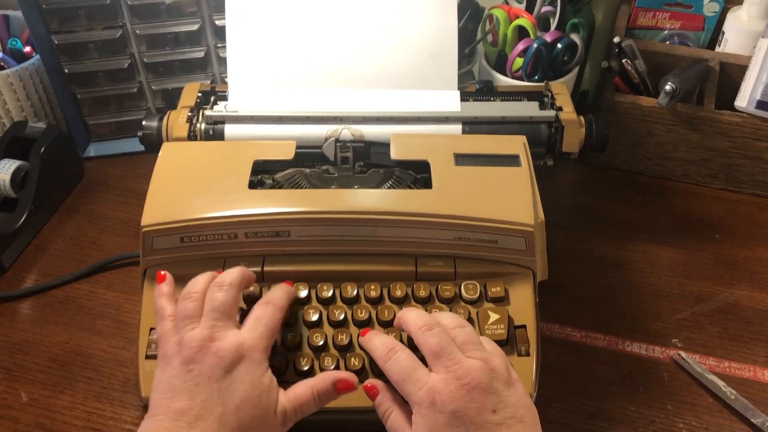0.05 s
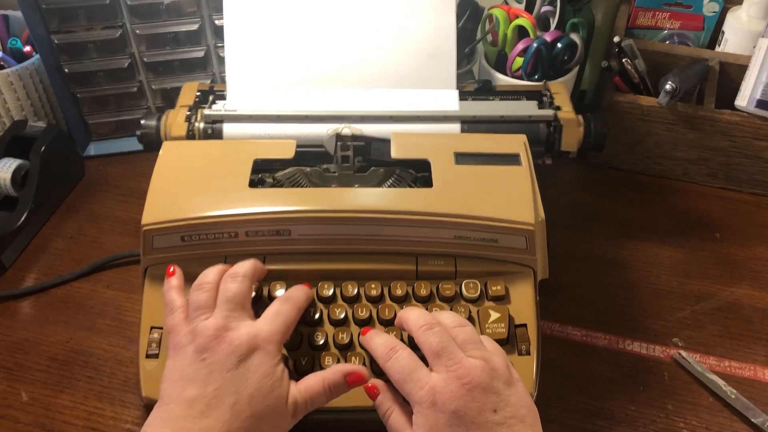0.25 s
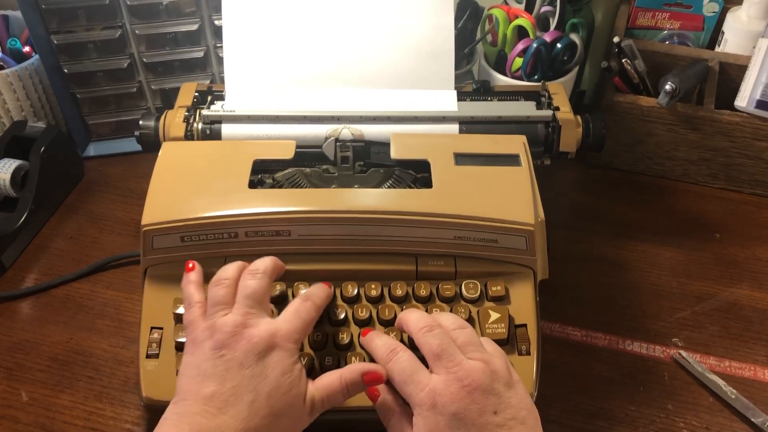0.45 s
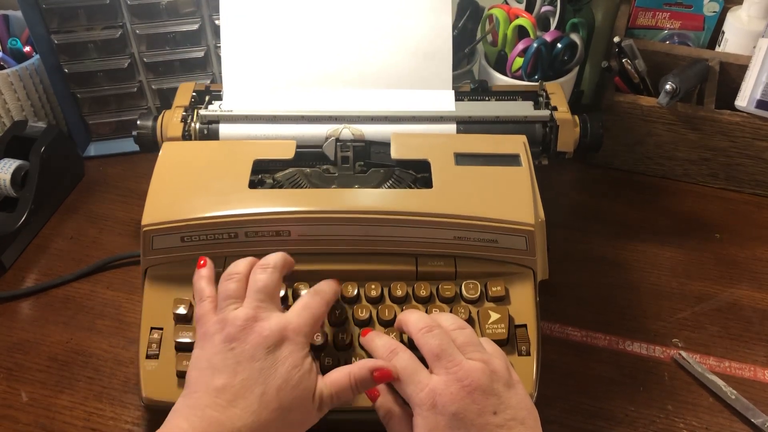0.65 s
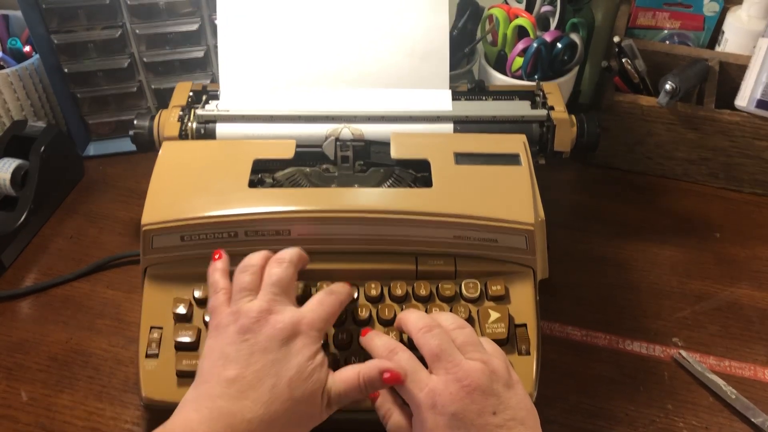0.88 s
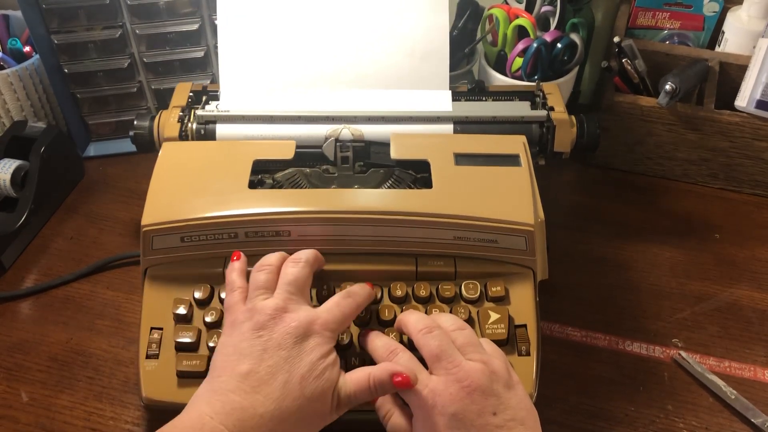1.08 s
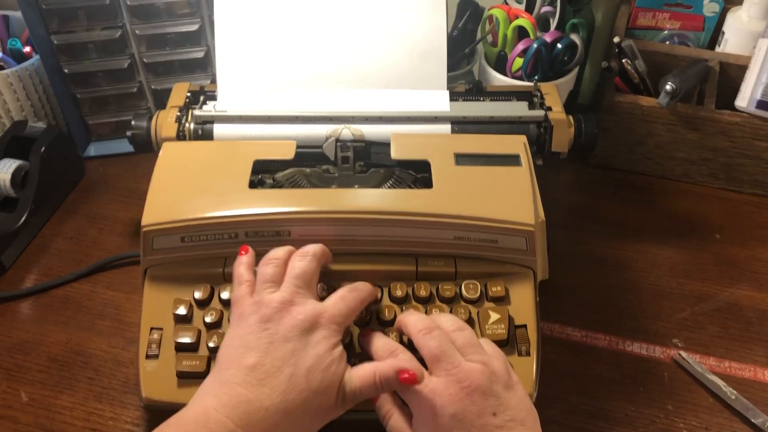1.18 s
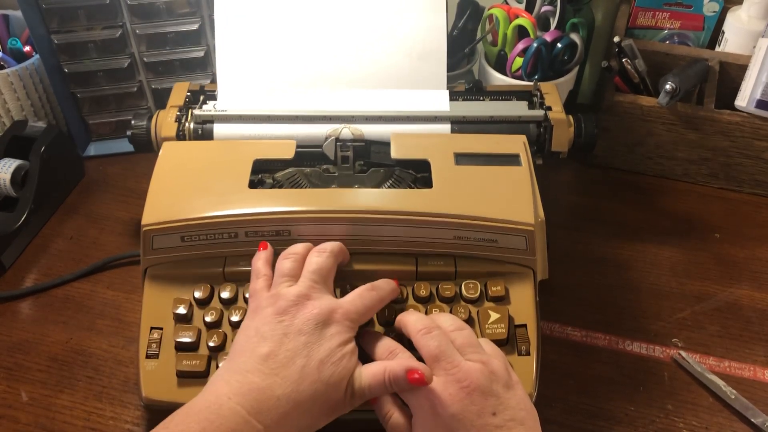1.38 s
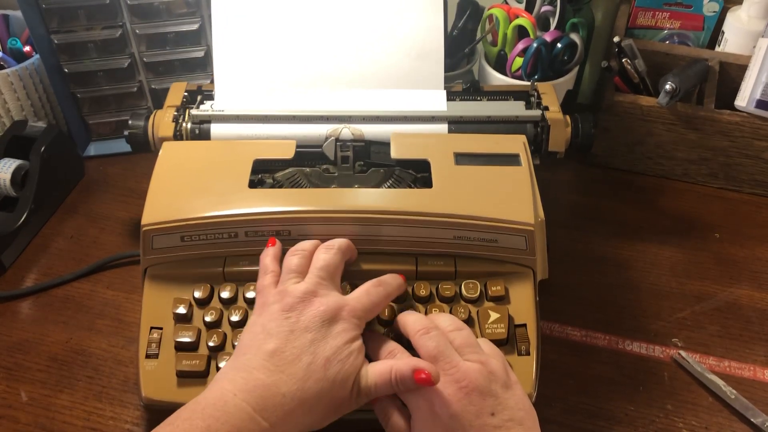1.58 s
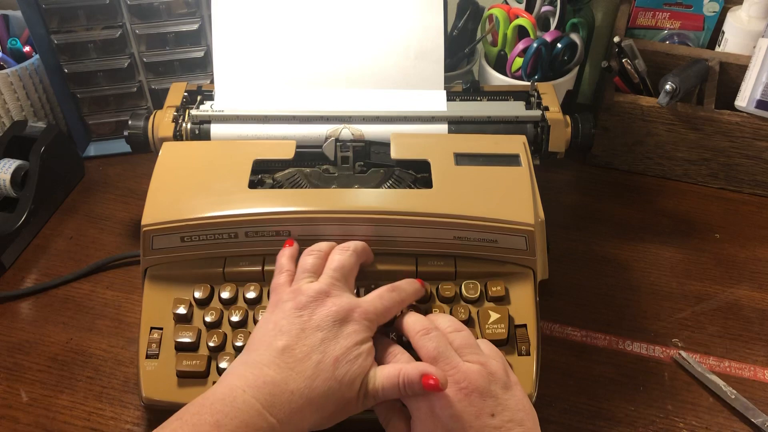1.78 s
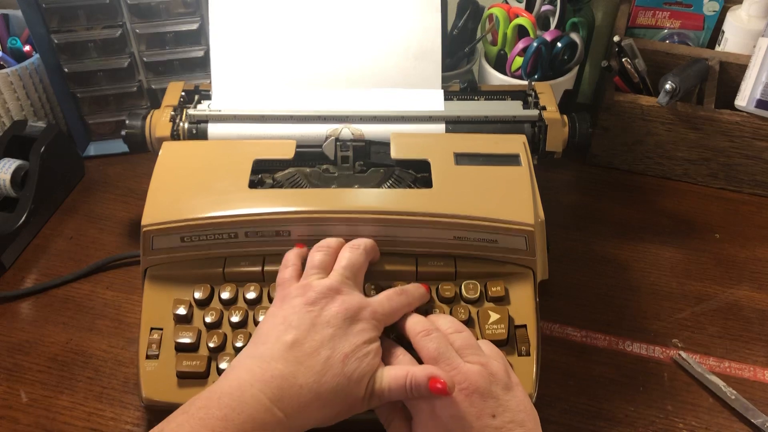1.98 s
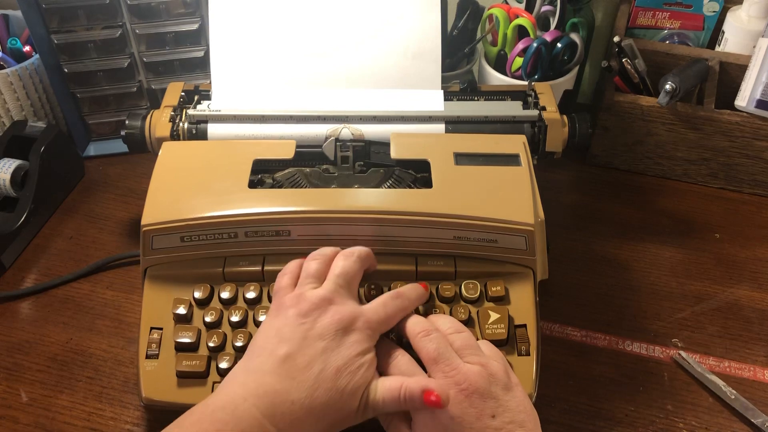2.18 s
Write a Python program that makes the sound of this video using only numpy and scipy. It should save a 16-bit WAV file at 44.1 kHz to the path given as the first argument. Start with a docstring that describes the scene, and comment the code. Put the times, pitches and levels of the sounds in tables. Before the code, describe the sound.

An electric typewriter strikes five evenly paced letters, pauses briefly, then strikes one more. Each sharp clack brings a metallic rattle and a small desk thump. Its motor hums faintly, heard close up in a small quiet room.

```python
"""A small quiet room, where an electric typewriter is typing on a wooden desk.
Each key swings a steel type bar that cracks against the paper roller. The parts around it clatter and
ring, and the machine rocks on its feet and thumps the desk. Between strokes, keys tick and fingers tap.
The motor hums underneath, and the walls add a short echo to the typing."""
import sys
import numpy as np
from scipy import signal
from scipy.fft import rfft, irfft
from scipy.io import wavfile

SR = 44100
rng = np.random.default_rng(int(sys.argv[2]) if len(sys.argv) > 2 else 0)


def to_wav(sig):
    """Store sig (one row per channel, or 1-D mono) as 16-bit WAV at the path in sys.argv[1].

    Samples outside -1..1 are clipped; the rate is SR.
    """
    pcm = np.clip(np.atleast_2d(sig), -1, 1) * 32767
    pcm = np.round(pcm).astype(np.int16)
    wavfile.write(sys.argv[1], SR, pcm.T)  # frames by channels


N = 99225
LEAD = SR // 4   # extra samples before time zero, so an earlier stroke can ring into the scene
TOUCH_GAIN = np.sqrt(.01 * SR)   # gives a touch the energy of a signal at level 1 lasting 10 ms

# The typed letters. Each row: time of the crack in seconds, levels of crack, clatter and thump in dB,
# extra delay of the bar's return in seconds, recoil pitch in Hz, level of the settling thud in dB.
STROKES = [(-.072, -14, -3, 0, -0.00045, 148, -43), (0.242, 1.5, -1.5, -1, .001, 130.7, -28),
           (0.509, 1.5, -1, 0.5, 0.00065, 142.5, -30.5), (0.8152, 2.5, -1, -0.5, -0.00052, 150, -40.5),
           (1.1232, 1.5, -1.64, 0.5, .001, 134, -35), (1.4298, 1, -2, -1, 0.0032, 159.6, -39.5),
           (1.9365, 3.5, -2, -1, .001, 168.6, -42)]
# The tones of a crack. Each row: pitch in Hz, level in dB, ring time (to fade by 60 dB) in seconds.
CRACK_TONES = [(1219, -26.5, 0.013), (1570, -27, .014), (3050, -22, 0.017), (4400, -19.5, .007),
               (5150, -15.5, 0.014), (6690, -12, 0.011), (7160, -1, 0.0053), (8680, -8, .008),
               (10400, -34.5, 0.0043), (12982, -4.5, 0.0033)]
def type_cracks():
    """The type hits the roller and rebounds at once; every bar rings at slightly different pitches."""
    crack_db, rebound_s, rebound_db = -5.5, .00056, -13.5
    out = np.zeros(LEAD + N)
    for start, db, *_ in STROKES:
        bar = ring([(hz * (1 + rng.normal(0, .015)), level, ring_s) for hz, level, ring_s in CRACK_TONES])
        add(out, start, from_db(crack_db + db) * bar)
        add(out, start + rebound_s, from_db(crack_db + db + rebound_db) * bar)
    return out


# The contacts in a stroke: the drive grabs, the bar swings, the type lands, the carriage steps. Each row:
# seconds from the crack, rattle length in seconds, levels of case, frame, steel and small parts in dB.
STROKE_CONTACTS = [(-.0345, .006, -41, -37.5, -40.5, -39), (-.027, 0.0088, -38.5, -36.5, -42, -35.5),
                   (-.019, .014, -33, -32, -37, -43.5), (-.007, .003, -52, -36, -35, -30),
                   (-.0045, .004, -32, -30, -26, -22), (-.0007, .001, -39, -30, -20, -34),
                   (.009, .005, -45.5, -35.5, -23, -33), (.0130, .006, -33, -36, -20.5, -34),
                   (0.0208, .005, -33.5, -28, -23, -28.5), (0.032, .008, -44, -32.5, -30, -39)]
# The bar falls back on its rest and bounces. Each row reads as above.
RETURN_CONTACTS = [(0.0374, 0.0058, -29.5, -26, -30.5, -30.5), (.044, 0.0083, -28.5, -32.5, -31.5, -44),
                   (0.057, 0.015, -33.5, -36, -41, -48)]
# The tone colour of each part. Each row: frequency in Hz, level in dB.
CASE_COLOUR = [(50, -40), (100, -13.5), (170, 0), (320, 1.5), (480, -1), (700, -2.5), (1100, -3.5),
               (1600, -7), (2600, -13), (6000, -54.5)]
FRAME_COLOUR = [(300, -58), (800, -15.5), (1300, -2.5), (1650, 0), (2100, -3), (3000, 0), (3600, -3.5),
                (4500, -4), (6500, -17), (14000, -50)]
STEEL_COLOUR = [(1200, -60), (3200, -17), (4500, -4), (5200, 0), (6300, 0.5), (7300, -3.5), (8600, 0),
                (9600, -10.5), (12000, -11.5), (18000, -42)]
SMALL_PARTS_COLOUR = [(2000, -52), (6000, -3.5), (8500, 0), (10400, 3.5), (11500, 1.5), (13000, 0.5),
                      (15500, -2.5), (18000, -10.5)]
# Ring times in seconds of the case, frame, steel and small parts.
PART_RING_S = (0.04, 0.027, 0.02, 0.021)
# The basket that holds the type bars. Each row: pitch in Hz, level in dB, ring time in seconds.
BASKET_TONES = [(1606, 3, 0.33), (2960, 3, 0.13), (4800, -2, 0.28), (5450, 5.5, .25), (5850, -8.5, 0.073),
                (6114, -2, .22), (5750, -8, .22), (6240, -12, .2), (6590, 5.5, .2), (6950, -13, .22),
                (7082, -2, 0.11), (7381, 6, .22), (7900, -5, .16), (9000, -16, .18)]
def clatter():
    """Each stroke shakes the case, frame, steel and small parts; the basket rings with the steel."""
    shakes = np.zeros((4, LEAD + N))
    for start, _, clatter_db, _, return_delay, *_ in STROKES:
        for delay, contacts in ((0, STROKE_CONTACTS), (return_delay, RETURN_CONTACTS)):
            for offset, length, *levels in contacts:
                for shake, db, ring_s in zip(shakes, levels, PART_RING_S):
                    add(shake, start + offset + delay, from_db(db + clatter_db) * contact(length, ring_s))
    colours = (CASE_COLOUR, FRAME_COLOUR, STEEL_COLOUR, SMALL_PARTS_COLOUR)
    parts = sum(coloured(shake, colour) for shake, colour in zip(shakes, colours))
    basket = through(shakes[2], unit(ring(BASKET_TONES)))
    return parts + from_db(-15) * basket


def contact(length, ring_s, clicks_per_s=2200, spread_db=3):
    """A first touch and a dying rattle of tiny clicks set a part ringing, differently every time."""
    t = seconds(.06)
    ringing = rng.standard_normal(len(t)) * from_db(-60 * t / ring_s)   # countless tones blur into noise
    clicks = (rng.random(len(t)) < clicks_per_s / SR) * rng.choice([-1, 1], len(t))
    strengths = from_db(spread_db * rng.standard_normal(len(t)))
    rattle = unit(clicks * strengths * np.exp(-t / length))
    rattle[0] += .51   # the first touch
    return unit(signal.fftconvolve(rattle, ringing)) * TOUCH_GAIN


# The shoves a stroke gives the desk. Each row: seconds from the crack, length in seconds, level in dB.
DESK_SHOVES = [(-.021, 0.0016, -28), (.012, 0.0022, -25.5), (.046, 0.0018, -25), (.064, 0.0047, -21)]
# The low tones of the wooden desk. Each row: pitch in Hz, level in dB, ring time in seconds.
DESK_TONES = [(57.9, -19, .1), (77, -5.5, .13), (123.4, -4, 0.15), (162, -8, 0.12), (178, -9.5, 0.02),
              (275.3, -6.5, 0.16), (323.7, -4, .11), (466.7, -2, .12)]
def thumps():
    """The machine recoils on its feet as the bar is thrown, then settles; its shoves make the desk boom."""
    force, rocking = np.zeros((2, LEAD + N))
    t = seconds(.02)
    for start, _, _, thump_db, _, recoil_hz, settle_db in STROKES:
        add_rocking(rocking, start - .0112, thump_db - 23.5, recoil_hz, width_s=.0065)
        add_rocking(rocking, start + .062, settle_db, hz=148.2, width_s=.011)
        for offset, length, db in DESK_SHOVES:
            push = np.sin(np.pi * np.minimum(t / length, 1)) ** 2
            add(force, start + offset + rng.normal(0, .0012), from_db(db + thump_db) * push / push.sum())
    return rocking + through(force, ring(DESK_TONES)) / 2


def add_rocking(track, peak_s, db, hz, width_s):
    """Mix in one rock of the machine: a few slow swings that swell and fade around peak_s."""
    t = seconds(.1) - .05
    swings = -np.cos(2 * np.pi * hz * t) * np.exp(-(t / width_s) ** 2)
    add(track, peak_s - .05, from_db(db) * swings)


# Keys going down and springing back. Each row: start in seconds, rattle length in seconds,
# levels of the bright tick, the dull knock and the spring's ping in dB.
KEY_TICKS = [(.0783, 0.0035, -39.5, -44, -40), (.175, .002, -66, -62, -72), (0.196, .002, -58, -48, -57),
             (0.3705, .002, -43, -41, -42), (.470, 0.0042, -48, -49.5, -67), (0.669, .005, -50, -51, -57),
             (0.682, 0.024, -53, -50, -58), (0.727, .001, -61.5, -49.5, -71),
             (0.9415, 0.0017, -46, -55, -61.5), (1.052, .003, -61.5, -68, -71),
             (1.077, 0.0038, -42, -53, -65), (1.2442, 0.0014, -46, -43.5, -45),
             (1.6035, .002, -54.5, -54, -53.5), (1.814, 0.00083, -64.5, -69, -75),
             (1.833, 0.0022, -62, -64, -69.5), (1.893, 0.0039, -71, -70, -72),
             (2.074, 0.042, -46, -51, -62), (2.0925, .005, -51.5, -41, -57), (2.131, .007, -48, -45.5, -58)]
# The ping of a key spring. Each row: pitch in Hz, level in dB, ring time in seconds.
PING_TONES = [(9390, -8, .014), (10500, -2.5, .032), (11450, 2.5, .016), (11700, -16, .028),
              (14340, -6, .04)]
def key_ticks():
    """Keys tick against their stops and their springs ping."""
    ticks, knocks, pings = np.zeros((3, LEAD + N))
    _, frame_ring_s, _, small_parts_ring_s = PART_RING_S
    ping = TOUCH_GAIN * unit(ring(PING_TONES))
    for start, length, tick_db, knock_db, ping_db in KEY_TICKS:
        add(ticks, start, from_db(tick_db) * contact(length, small_parts_ring_s))
        add(knocks, start, from_db(knock_db) * contact(length, frame_ring_s))
        add(pings, start, from_db(ping_db) * ping)
    dull = (coloured(knocks, FRAME_COLOUR) + coloured(knocks, STEEL_COLOUR)) / np.sqrt(2)
    return coloured(ticks, SMALL_PARTS_COLOUR) + dull + pings


# Fingers knocking on keys. Each row: start in seconds, level in dB, main pitch in Hz,
# its ring time in seconds, level shift of the side tones in dB.
FINGER_TAPS = [(1.326, -43, 2230, .03, 0), (2.075, -38, 905, .07, -15), (2.093, -47, 2800, .1, -10)]
# A key top's side tones. Each row: multiple of the main pitch, level in dB, ring time in seconds.
SIDE_TONES = [(0.579, -5, .04), (.75, -5, .035), (1.16, -3.5, .02), (1.529, -3, .02), (2.2, -6, .012)]
def finger_taps():
    """Fingers knock on the hollow key tops; a soft fingertip dulls the treble."""
    out = np.zeros(LEAD + N)
    soften = signal.butter(2, 3000, fs=SR, output="sos")
    for start, db, hz, main_ring_s, side_db in FINGER_TAPS:
        sides = [(hz * ratio, level + side_db, ring_s) for ratio, level, ring_s in SIDE_TONES]
        key_top = ring([(hz, 0, main_ring_s)] + sides)
        add(out, start, from_db(db) * TOUCH_GAIN * unit(signal.sosfilt(soften, key_top)))
    return out


def long_basket_ring(hz=3070, db=-55.5, ring_s=1.14):
    """One tone of the type-bar basket sings faintly and long after each stroke."""
    out = np.zeros(LEAD + N)
    for start, *_ in STROKES:
        add(out, start, ring([(hz, db, ring_s)]))
    return out


# The motor's hum. Each row: pitch in Hz, level in dB, amount of waver (0 is steady).
HUM_TONES = [(58, -62, .2), (120, -52, 0.3), (146.5, -67.5, 0), (235.7, -61.5, 0), (344.6, -64.5, .4),
             (431, -72.5, 0.7), (456, -63, 0), (645, -67, 0.7), (753, -63, 0), (986, -62, 0),
             (1104, -65, .4), (1713, -75, .6)]
# The tone colour of motor whirr and room air. Each row: frequency in Hz, level in dB.
WHIRR_COLOUR = [(15, -69), (25, -40), (86, -16), (122, 4.5), (188, -33.5), (233, -9.5), (445, -8),
                (482, -17.5), (523, -13.5), (997, -11.5), (1170, -19), (15500, -42.5)]
def motor(whirr_db=-53, waver_hz=7.2):
    """The motor hums over a soft whirr; some of its tones waver, others hold steady."""
    t = np.arange(N) / SR
    slow = signal.butter(2, waver_hz, fs=SR, output="sos")
    whirr = sum(weight * from_db(at_hz(WHIRR_COLOUR, hz)) * unit(noise) for hz, noise, weight in bands(N))
    out = from_db(whirr_db) * np.sqrt(N) * unit(whirr)
    for hz, db, waver in HUM_TONES:
        a, b = signal.sosfilt(slow, rng.standard_normal((2, LEAD + N)))[:, LEAD:]
        drift = np.sqrt(N / 2) * (unit(a) + 1j * unit(b))   # moves both loudness and phase
        wobble = (1 + waver * drift) / np.hypot(1, waver)
        tone = np.exp(2j * np.pi * (hz * t + rng.random()))
        out += from_db(db) * np.sqrt(2) * np.real(wobble * tone)
    return out


# How long the room rings. Each row: frequency in Hz, ring time in seconds.
ROOM_RING = [(100, 0.6), (400, .36), (1500, .33), (4000, 0.34), (8000, 0.23), (15000, 0.12)]
# The echo's tone colour. Each row: frequency in Hz, level in dB compared with the direct sound.
ROOM_COLOUR = [(60, -11), (200, -6.5), (1000, -7), (3000, -13), (6500, -12.5), (10000, -14), (15000, -12.5)]
def room_echo(x, delay_s=.0057, build_s=.003):
    """Reflections from the walls build up quickly and die sooner in the treble."""
    t = seconds(.5)
    build = 1 - np.exp(-np.maximum(t - delay_s, 0) / build_s)
    echo = np.zeros(len(t))
    for hz, noise, weight in bands(len(t)):
        fade = from_db(-60 * t / at_hz(ROOM_RING, hz))
        echo += weight * from_db(at_hz(ROOM_COLOUR, hz)) * unit(noise * build * fade)
    return through(x, echo)


def ring(tones):
    """Half a second of a struck object: a few pure tones, each fading at its own rate."""
    t = seconds(.5)
    return sum(from_db(db - 60 * t / ring_s) * np.cos(2 * np.pi * hz * t) for hz, db, ring_s in tones)


def coloured(x, colour):
    """Give x a tone colour, with a filter that keeps white noise equally strong."""
    size = 4096
    hz = np.maximum(np.fft.rfftfreq(size, 1 / SR), 1)
    cepstrum = irfft(np.log(from_db(at_hz(colour, hz))))
    # Fold the second half onto the first, so the filter rings only after a hit.
    cepstrum[1:size // 2] *= 2
    cepstrum[size // 2 + 1:] = 0
    return through(x, unit(irfft(np.exp(rfft(cepstrum)))))


def bands(size):
    """Noise in third-octave bands, each as: centre in Hz, noise, weight for the band's width."""
    edges = np.geomspace(28, 18000, 29)
    for low, high in zip(edges, edges[1:]):
        band = signal.butter(2, [low, high], "band", fs=SR, output="sos")
        noise = signal.sosfilt(band, rng.standard_normal(size + SR // 10))[-size:]
        yield np.sqrt(low * high), noise, np.sqrt(2 * (high - low) / SR)


def from_db(db):
    """Turn decibels into a multiplier."""
    return 10 ** (np.asarray(db) / 20)


def unit(x):
    """Scale x to a total energy of 1."""
    return x / np.sqrt(np.sum(x ** 2) + 1e-20)


def seconds(length):
    """The time of each sample, in seconds."""
    return np.arange(int(length * SR)) / SR


def at_hz(table, hz):
    """Read between a table's rows, with octaves evenly spaced."""
    frequencies, values = np.transpose(table)
    return np.interp(np.log(hz), np.log(frequencies), values)


def add(track, start, x):
    """Mix x into a track at a start time in seconds."""
    i = max(LEAD + int(round(start * SR)), 0)
    track[i:i + len(x)] += x[:max(len(track) - i, 0)]


def through(x, response):
    """Play x through an object, given that object's response to one click."""
    return signal.fftconvolve(x, response)[:len(x)]


def scene():
    """The typing, its echo and the motor, in one channel."""
    typing = clatter() + type_cracks() + thumps() + long_basket_ring() + key_ticks() + finger_taps()
    in_room = typing + room_echo(typing)
    return (in_room[LEAD:] + motor())[None]


def record(dry):
    """The microphone drops the deep bass, the tallest peaks are rounded and the highest treble is cut."""
    x = signal.sosfilt(signal.butter(3, 60, "high", fs=SR, output="sos"), dry)
    rounded = x / (1 + (x / .95) ** 4) ** .25
    return signal.sosfilt(signal.ellip(10, .2, 80, 15800, fs=SR, output="sos"), rounded)


dry = scene()
out = record(dry)
to_wav(out)
```